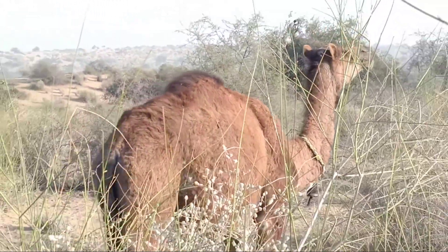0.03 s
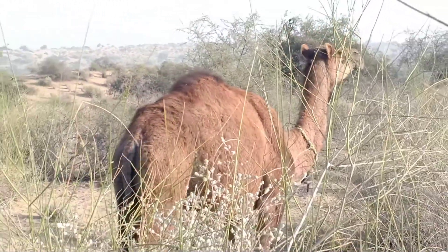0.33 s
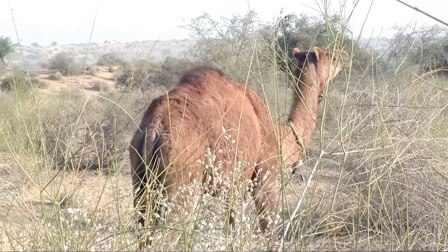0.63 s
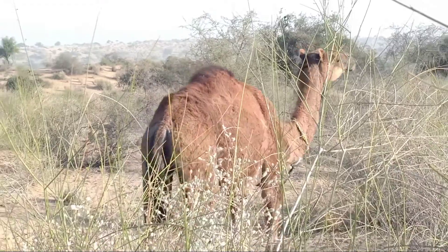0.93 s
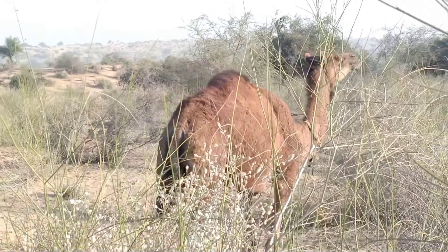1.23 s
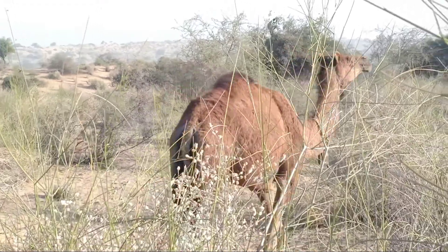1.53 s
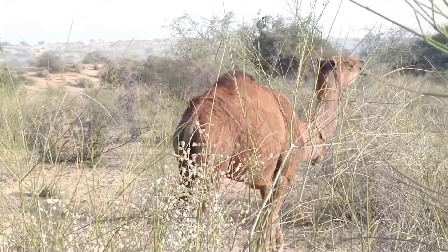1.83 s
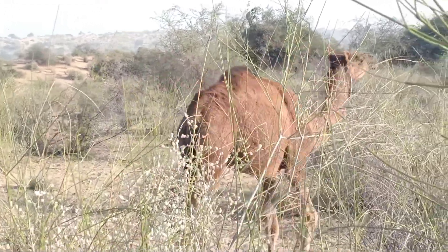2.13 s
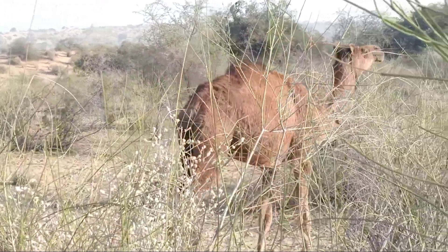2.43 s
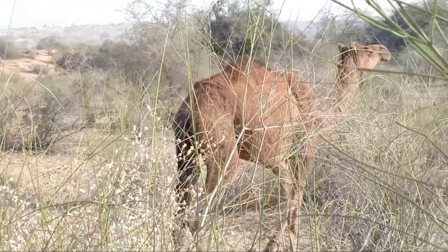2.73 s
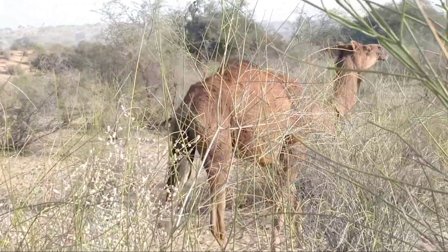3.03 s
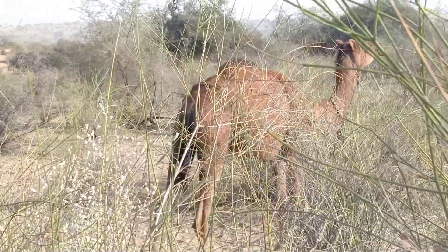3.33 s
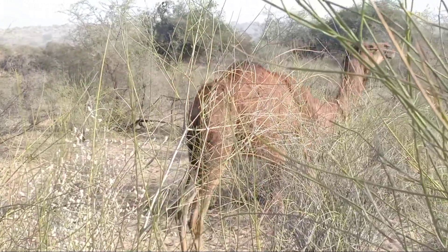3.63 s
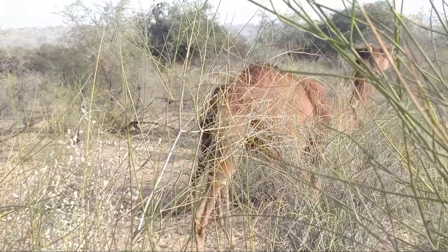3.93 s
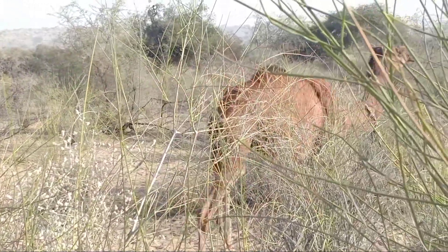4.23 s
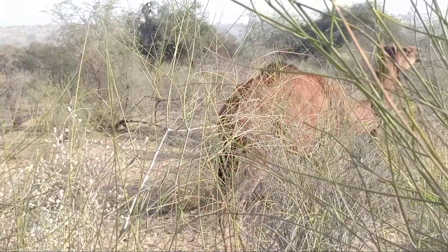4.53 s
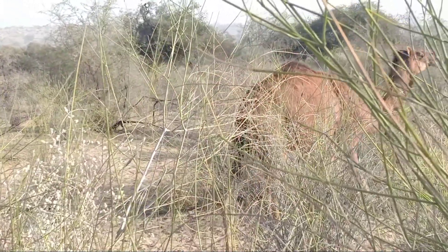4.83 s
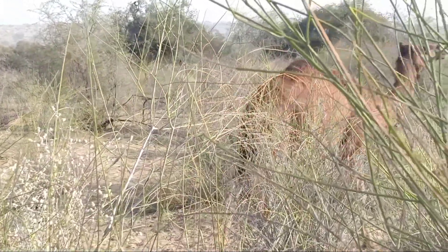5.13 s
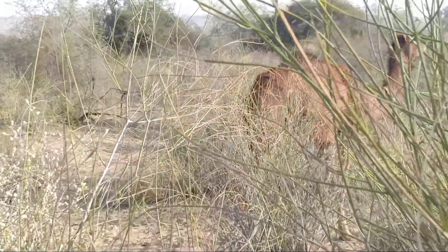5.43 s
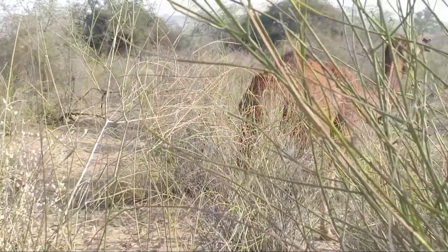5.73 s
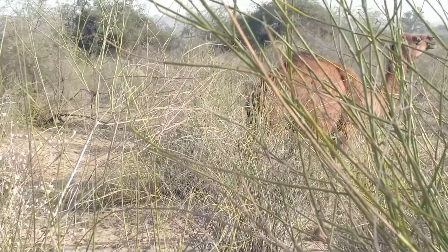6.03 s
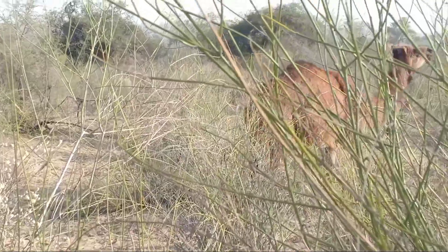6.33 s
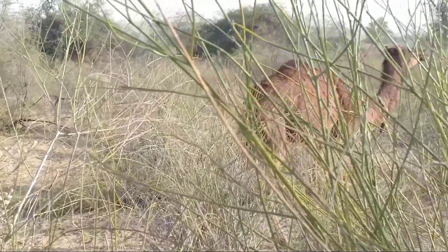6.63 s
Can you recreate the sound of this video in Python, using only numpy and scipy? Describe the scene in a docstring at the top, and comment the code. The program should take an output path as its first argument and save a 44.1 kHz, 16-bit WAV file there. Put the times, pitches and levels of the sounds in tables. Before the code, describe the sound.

A metal bell on a walking camel's neck clanks unevenly, with faint twig snaps, distant birds and soft finger bumps on the microphone.

```python
"""A camel's sheet-metal neck bell clanks unevenly as it walks through dry scrub, each blow of the
clapper ringing the modes of the rim. Twigs snap under it, grass brushes its legs, and small birds
call in the distance. The stereo microphones sit on a hand-held camera: the left is open to a light
wind; the right, under the hand, hears the fingers bump and mainly the lowest notes of the bell."""
import sys
import numpy as np
from scipy import signal
from scipy.fft import rfft, irfft
from scipy.io import wavfile
from scipy.ndimage import uniform_filter1d, map_coordinates

SR = 44100
rng = np.random.default_rng(int(sys.argv[2]) if len(sys.argv) > 2 else 0)


def to_wav(s):
    """Save 16-bit WAV."""
    ch = np.atleast_2d(s).T  # columns
    pcm = np.round(np.clip(ch, -1, 1) * 32767)  # PCM
    wavfile.write(sys.argv[1], SR, pcm.astype(np.int16))


N = 299439


def bell(rise_s=0.00072, low_rise_s=0.0022, choke_s=0.24, twin_choke_s=0.56, node_floor=0.037,
         knock_s=0.042, clash_s=0.03, tick_s=0.012):
    """Each blow rings the modes as strongly as they move at the place struck; the two lowest beat."""
    # clapper blows: (time [s], place on the rim [deg], hum [dB], clank [dB],
    # brightness over the clank [dB], hardness [dB])
    strikes = [(-0.1, 77, -20.5, -44.5, -33, 0), (0.063, 36.5, -31, -53, -11.5, -15),
               (0.3015, 53.4, -54, -45.5, -26, -11.5), (0.7634, 91, -14, -45, 16, -5),
               (1.0112, 9, -18, -39, 3, -11.5), (1.1974, 5.1, -14.5, -31, -6, -9),
               (2.2352, 37.6, -18.5, -42.5, -2.5, -16), (2.9022, 73.8, -26.5, -46, -10.5, -3),
               (3.2587, 123, -32, -51.5, -20, -6), (3.5209, 10.6, -22, -38, -9, -3),
               (3.7641, 114, -25, -41.5, -1.5, -3.5), (4.2197, 157.5, -19.5, -36, -4.5, 4),
               (4.597, 93, -38.5, -56, -13.5, -5), (4.769, 3.8, -23.5, -38.5, -4.5, -1),
               (5.1858, 117, -24.5, -40, 1, -5), (5.5258, 59, -24.5, -35, -11, 0.5),
               (5.942, 46, -35.5, -52.5, -25, 1), (6.2158, 92, -22.5, -37, -13, -5),
               (6.6737, 100, -32.5, -45, -8, -14)]
    # bell modes: (frequency [Hz], level [dB], t60 [s], waves around the rim [count], pattern turn [deg])
    modes = [(804.9, 0.0, 0.162, 2.0, 0.0), (854.9, -11.0, 0.76, 2.0, 90.0),
             (1896.5, -10.0, 0.294, 3.0, 114.0), (2533.0, 0.0, 0.135, 7.0, 144.0),
             (3502.0, -17.0, 0.226, 3.0, 90.0), (3915.7, -9.0, 0.219, 3.0, 78.0),
             (4227.8, -4.0, 0.303, 6.0, 102.0), (4484.5, -2.0, 0.219, 2.0, 84.0),
             (4542.6, -3.0, 0.215, 9.0, 48.0), (5504.0, 0.0, 0.108, 8.0, 54.0),
             (5773.0, -5.0, 0.109, 7.0, 156.0), (5882.0, -3.0, 0.109, 3.0, 30.0),
             (6169.0, 0.0, 0.06, 6.0, 66.0), (6721.0, -4.0, 0.069, 7.0, 30.0),
             (6395.0, -15.0, 0.06, 8.0, 40.0), (7235.0, -3, 0.07, 7.0, 130.0),
             (7391.0, -6, 0.08, 4.0, 70.0), (7558.0, -5, 0.11, 8.0, 10.0), (7773.0, -4, 0.11, 8.0, 100.0),
             (8333.0, -7, 0.06, 5.0, 50.0), (8807.0, -5, 0.06, 9.0, 150.0), (8963.0, -7, 0.06, 9.0, 60.0),
             (9571.0, -8, 0.05, 6.0, 110.0), (10492.0, -14, 0.04, 10.0, 30.0),
             (11552.0, -14, 0.04, 7.0, 80.0), (12220.0, -14, 0.04, 11.0, 140.0),
             (14411.0, -14, 0.03, 12.0, 20.0), (14933.0, -11, 0.03, 12.0, 110.0)]
    hz, mode_db, t60, waves, turn = np.array(modes, float).T[:, :, None]
    family = np.searchsorted([1200, 4100, 5000, 7000], hz)  # hum, middle, clank, high, top
    ends = [row[0] for row in strikes[1:]] + [N / SR]
    out = np.zeros(N)
    for (s, place, hum_db, clank_db, bright_db, hard_db), end in zip(strikes, ends):
        t = np.arange(int((end - s + 0.018) * SR)) / SR
        middle_db = (hum_db + clank_db) / 2
        high_db = clank_db + bright_db
        top_db = clank_db - 9.5 + 0.6 * bright_db + hard_db
        family_db = np.array([hum_db, middle_db - 11, clank_db, high_db, top_db])
        shape = np.cos(np.radians(waves * place - turn))
        size = gain_of(family_db[family] + mode_db) * np.copysign(np.hypot(shape, node_floor), shape)
        phase = rng.uniform(0, 2 * np.pi, hz.shape)
        phase[1] = phase[0] - 1.2  # the second of the two low twins starts behind the first
        envelope = (1 - np.exp(-t / np.where(family == 0, low_rise_s, rise_s))) ** 2
        envelope *= np.exp(-np.log(1000) * t / t60)
        # the low twins die ever faster as the bell falls back on the neck
        envelope[:2] *= np.exp(-(t / [[choke_s], [twin_choke_s]]) ** 2)
        ring = (size * envelope * np.sin(2 * np.pi * hz * t + phase)).sum(0)
        # the contact itself: a dull knock, a short clash and a bright tick
        knock, clash, tick = rng.standard_normal((3, len(t)))
        ring += gain_of(middle_db - 12) * band(knock, 820, 1300) * np.exp(-t / knock_s)
        ring += gain_of(high_db - 16) * band(clash, 2400, 7600, order=5) * np.exp(-t / clash_s)
        ring += gain_of(top_db - 8) * band(tick, 6000, 10000, order=4) * np.exp(-t / tick_s)
        ring += gain_of(top_db - 11) * band(tick, 13000, 15400, order=1) * np.exp(-t / tick_s)
        add(out, s, ring * np.clip((t[-1] - t) / 0.0058, 0, 1))  # the clapper's next touch stops it
    return out


def swing(x, sway_m=0.075, facing_db=-0.9):
    """The bell swings on its strap: its distance bends the pitch a little, its facing the level."""
    # swinging motion: (frequency [Hz], level [dB])
    motion = [(.3, -20), (1.2, 0), (2.5, 0), (6, -30), (20, -100), (200, -200)]
    sway, facing = evened(coloured(motion)), evened(coloured(motion))
    delay_samples = sway_m * sway / 343 * SR
    bent = map_coordinates(x, [np.arange(N) - delay_samples], order=3, mode="nearest")
    return gain_of(facing_db * facing) * bent


def scrub(snap_s=0.005, crackle_per_s=400, idle_db=-82):
    """Down at the camel's feet, single twigs snap over swishes of fine crackle."""
    # dry twigs snapping: (time [s], level [dB])
    twigs = [(1.307, -46), (1.571, -38.5), (1.616, -44.5), (1.646, -44.5), (1.673, -44.5), (1.685, -45.5),
             (2.63, -50.5), (5.074, -49)]
    # dry grass brushing past the legs: (time [s], half length [s], level [dB])
    swishes = [(0.89, 0.059, -68.5), (1.663, 0.071, -68.5), (2.0, 0.065, -83), (2.706, 0.051, -68),
               (3.41, 0.048, -69.5), (5.064, 0.027, -66)]
    snaps = np.zeros(N)
    burst = np.exp(-np.arange(2000) / SR / snap_s)
    for s, db in twigs:
        add(snaps, s, gain_of(db) * burst * rng.standard_normal(len(burst)))
    stems = rng.standard_normal(N) * (rng.random(N) < crackle_per_s / SR)
    stems += 0.096 * rng.standard_normal(N)
    push = gain_of(idle_db) + swells(swishes)
    crackle = snaps + 2 * push * evened(stems)
    return band(crackle, 3600, 5800, order=3) + gain_of(-7) * band(crackle, 600, 1900)


def hand(swell_cycles=0.22, fall_cycles=0.66, sag=0.43, rub_s=0.024, slips_per_s=14, slip_hz=139):
    """Fingers slip on the camera; its case answers with a cycle or two of sagging pitch."""
    # firm finger bumps: (time [s], level [dB], pitch [Hz])
    bumps = [(0.071, -43, 123), (0.099, -39.5, 153), (0.203, -45, 115), (0.227, -40, 125),
             (0.732, -30, 147.4), (0.837, -36.5, 146), (1.056, -35, 168.4), (1.07, -37.5, 251),
             (1.164, -39, 163), (1.362, -32, 139.3), (1.49, -39, 189.5), (1.869, -40.5, 167.5),
             (1.992, -43, 133), (2.077, -42, 144), (2.167, -32.5, 163), (2.184, -35.5, 155),
             (2.346, -32.5, 138), (2.431, -32.5, 151), (2.528, -36, 162), (2.646, -33.5, 237),
             (3.833, -37, 183), (4.69, -35.5, 157), (5.122, -34, 160), (6.158, -42, 125), (6.415, -35, 166),
             (6.453, -37, 126), (6.682, -30, 169), (6.76, -26.5, 275)]
    # rumble of the shifting grip: (time [s], level [dB])
    grip_levels = [(0.0, -76), (0.38, -73), (0.53, -73), (1.09, -80), (1.23, -57.5), (1.66, -71),
                   (2.12, -72.5), (2.34, -62.5), (3.18, -75.5), (3.57, -66), (4.05, -76), (4.25, -76),
                   (4.78, -86.5), (5.2, -64), (5.39, -79), (6.11, -74.5), (6.26, -61.5), (6.79, -63.5)]
    # colour of that rumble: (frequency [Hz], level [dB])
    rumble_colour = [(20, -39), (50, -3.5), (90, 3), (150, 0), (250, -18), (400, -19.5), (700, -25.5),
                     (1500, -40.5), (8000, -91)]
    out, lead_s, clock = np.zeros(N), 0.015, np.arange(N) / SR
    t = np.arange(SR // 14) / SR - lead_s
    grip = gain_of(np.interp(clock, *np.transpose(grip_levels)) + 3)
    # the skin rubs just before and after each firm bump
    skin = sum(gain_of(db - 20.5) * np.exp(-abs(clock - s) / rub_s) for s, db, _ in bumps)
    rub = np.hypot(grip, skin)
    lumps = evened(band(rng.standard_normal(N), 9, 9.7))
    rumble = rub * evened(coloured(rumble_colour) * gain_of(5 * np.tanh(lumps)))
    slips = []  # light, at random times, riding on the level of the rub
    for i in np.flatnonzero(rng.random(N) < slips_per_s / SR):
        slip_db = 20 * np.log10(rub[i]) + 9.5 + 3 * rng.standard_normal()
        slips.append((clock[i], slip_db, slip_hz * rng.uniform(.8, 1.25)))
    for s, db, hz in bumps + slips:
        cycles = hz * t
        swell = np.exp(-(cycles / swell_cycles) ** 2 / 2)
        envelope = np.where(t < 0, swell, 1 / np.cosh(cycles / fall_cycles))
        turns = np.cumsum(hz * (1 - sag * np.tanh(cycles))) / SR
        friction = evened(band(rng.standard_normal(len(t)), 1.6 * hz, 3.82 * hz, order=3))
        scuff = gain_of(0.57 * db - 1) * friction * envelope ** 2  # harder bumps scuff more
        thud = envelope * np.sin(2 * np.pi * (turns + rng.random()))
        add(out, s - lead_s, gain_of(db) * (thud + scuff))
    return out + rumble


def birds(trill_hz=86, pulsing=0.26, gap_s=0.065, fall_octaves_per_s=6.2):
    """Distant birds: trilled notes pulse and droop at their ends; plain whistles fall at one rate."""
    # trilled phrases: (time [s], notes [count], note length [s], pitch [Hz], droop [share],
    # trill depth [Hz], level [dB])
    phrases = [(0.324, 1, 0.12, 2910, 0.2, 202, -67), (0.631, 2, 0.15, 3820, 0.1, 221, -66),
               (1.939, 1, 0.094, 2644, 0.12, 119, -66.5), (2.118, 3, 0.082, 4375, 0.019, 268, -63.5),
               (4.069, 4, .138, 3390, 0.24, 388, -59.5), (4.868, 1, 0.089, 2818, 0.0057, 246, -58)]
    # falling whistles: (time [s], length [s], starting pitch [Hz], level [dB])
    whistles = [(2.162, 0.041, 2880, -69.5), (3.013, 0.032, 3260, -68.5), (3.185, 0.037, 3050, -64),
                (3.409, 0.066, 3220, -62), (3.471, 0.062, 2880, -61), (3.96, 0.058, 3580, -66.5),
                (5.107, 0.041, 2825, -56), (5.829, 0.045, 3265, -58.5), (5.875, 0.089, 4396, -59.5)]
    out = np.zeros(N)
    for s, count, length, pitch, droop, depth, db in phrases:
        t = np.arange(int(length * SR)) / SR
        for k in range(count):
            trill = np.sin(2 * np.pi * (trill_hz * t + rng.random()))
            hz = pitch * (1 - droop * (t / length) ** 3) + depth * trill
            add(out, s + k * (length + gap_s), gain_of(db) * (1 - pulsing * trill) * note(hz))
    for s, length, start_hz, db in whistles:
        t = np.arange(int(length * SR)) / SR
        add(out, s, gain_of(db) * note(start_hz * 2 ** (-fall_octaves_per_s * t)))
    return out


def note(hz, waver=0.018, softness=0.72):
    """One bird note along a pitch curve: it wavers, swells and fades."""
    hz = hz * (1 + waver * evened(uniform_filter1d(rng.standard_normal(len(hz)), 120)))
    envelope = abs(np.sin(np.linspace(0, np.pi, len(hz)))) ** softness
    return envelope * np.sin(2 * np.pi * np.cumsum(hz) / SR)


def chatter(quietest_db=-79.25, range_db=7, count=260):
    """Many birds farther out in the scrub: short random slurs, some rising, some falling."""
    out = np.zeros(N)
    for when, length, pitch, slur, loud in rng.random((count, 5)):
        t = np.arange(int((0.017 + 0.032 * length) * SR)) / SR
        hz = 1650 * 3 ** pitch * (1 + (.15 - 0.29 * slur) * t / t[-1])
        whistle = np.hanning(len(t)) * np.sin(2 * np.pi * np.cumsum(hz) / SR)
        add(out, when * N / SR, gain_of(quietest_db + range_db * loud) * whistle)
    return out


def breeze(calm_db=-79.5, flutter_db=3):
    """Light wind flutters at the open microphone as a low rumble."""
    # gusts: (time [s], half length [s], level [dB])
    gusts = [(2.7, 0.11, -71), (3.55, 0.48, -75), (4.35, 0.14, -71), (4.87, 0.043, -65.5),
             (5.68, 0.079, -60.5)]
    flutter = evened(band(rng.standard_normal(N), 1.0, 5.3, order=1))
    buffeting = evened(band(rng.standard_normal(N), 62, 130) * gain_of(flutter_db * flutter))
    return (gain_of(calm_db) + swells(gusts)) * buffeting


def hiss():
    """Still air and microphone hiss, independent on each side."""
    # noise floor: (frequency [Hz], density [dB per Hz])
    floor = [(20, -116), (100, -103), (200, -105), (350, -111), (1000, -114), (2000, -117), (5500, -121),
             (8000, -127), (14000, -127), (15200, -118)]
    return np.sqrt(SR / 2) * np.array([coloured(floor), coloured(floor)])


def scatter(x, wet_db, t60, echoes_per_s=2000):
    """The direct sound plus short echoes from the bushes and the ground."""
    t = np.arange(SR // 3) / SR
    taps = rng.standard_normal(len(t)) * (rng.random(len(t)) < echoes_per_s / SR) * (t > .004)
    taps *= np.exp(-np.log(1000) * t / t60)
    return x + gain_of(wet_db) * signal.oaconvolve(x, taps / np.linalg.norm(taps))[:N]


def microphones(x):
    """The left microphone is open; sound reaches the covered right one late and dull."""
    # right microphone against the left: (frequency [Hz], level [dB], phase lag [rad])
    covered = [(100, -2, 0), (780, -3.7, 2.2), (880, -3.9, 2.25), (1900, -10, 4.7), (2500, -35, 5),
               (5000, -40, 5), (15000, -35, 5)]
    hz = np.fft.rfftfreq(N, 1 / SR)
    response = gain_of(read(covered, hz)) * np.exp(-1j * read(covered, hz, column=2))
    return np.array([x, irfft(rfft(x) * response, N)])


def gain_of(db):
    """Decibels to amplitude."""
    return 10 ** (np.asarray(db) / 20)


def evened(x):
    """Scales to rms 1."""
    return x / np.sqrt(np.mean(x ** 2) + 1e-20)


def read(points, hz, column=1):
    """One column of a spectrum table, joined on a log-frequency axis."""
    table = np.array(points, float)
    return np.interp(np.log(hz + 1), np.log(table[:, 0] + 1), table[:, column])


def coloured(points):
    """White noise shaped by a dB spectrum."""
    return irfft(rfft(rng.standard_normal(N)) * gain_of(read(points, np.fft.rfftfreq(N, 1 / SR))), N)


def band(x, low_hz, high_hz, order=2):
    """Causal band-pass."""
    return signal.sosfilt(signal.butter(order, [low_hz, high_hz], "band", fs=SR, output="sos"), x)


def swells(table):
    """Smooth rises and falls of amplitude from rows (time [s], half length [s], level [dB])."""
    t = np.arange(N) / SR
    return sum(gain_of(db) * np.exp(-((t - s) / half) ** 2) for s, half, db in table)


def add(mix, s, sound):
    """Mixes a sound in from time s."""
    start = round(s * SR)
    sound = sound[max(-start, 0):]
    part = mix[max(start, 0):][:len(sound)]
    part += sound[:len(part)]


def scene():
    """Bell near, scrub and birds beyond; at the camera, fingers mostly right and wind mostly left."""
    near = scatter(swing(bell()), wet_db=-25, t60=0.2)
    far = scatter(birds(), wet_db=-4.5, t60=0.027)
    far += scatter(chatter(), wet_db=1.0, t60=0.3)
    far += scatter(scrub(), wet_db=-7, t60=0.11)
    noise_floor = hiss()
    fingers = band(hand(), 33, 1400, order=1) * gain_of([[-32], [0]])
    wind = breeze() * gain_of([[0], [-18]])
    return microphones(near + far) + fingers + wind + noise_floor


def record(dry, edge_hz=15600):
    """A steep low-pass removes the treble above about 15.6 kHz."""
    low_pass = signal.firwin(511, edge_hz, window=("kaiser", 9), fs=SR)
    return signal.oaconvolve(dry, low_pass[None], "same")


dry = scene()
out = record(dry)
to_wav(out)
```